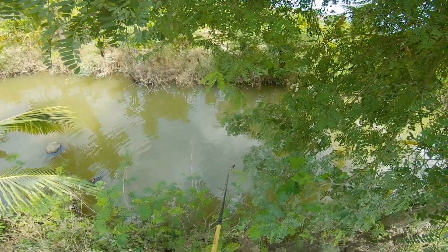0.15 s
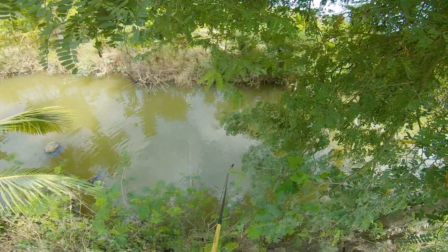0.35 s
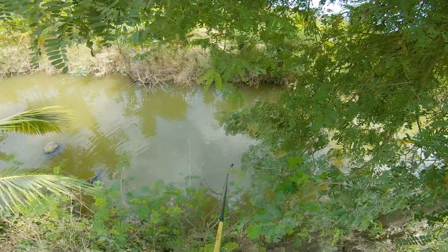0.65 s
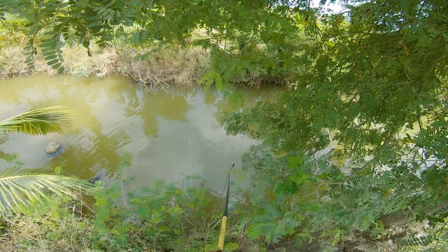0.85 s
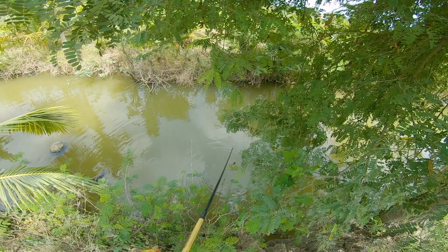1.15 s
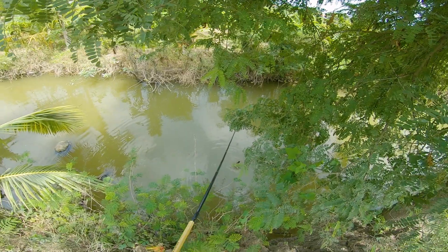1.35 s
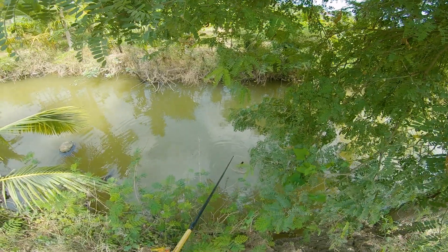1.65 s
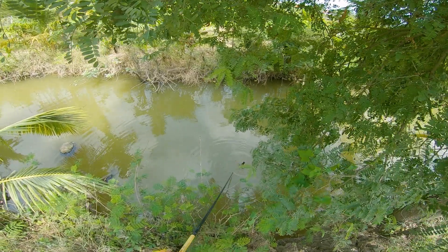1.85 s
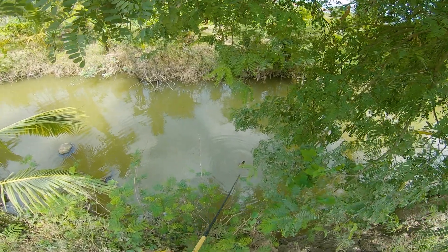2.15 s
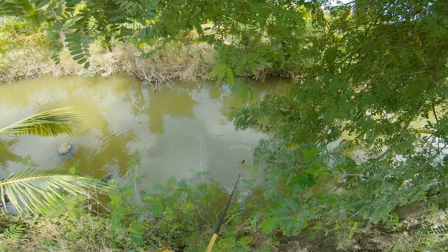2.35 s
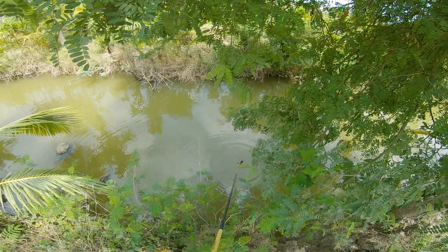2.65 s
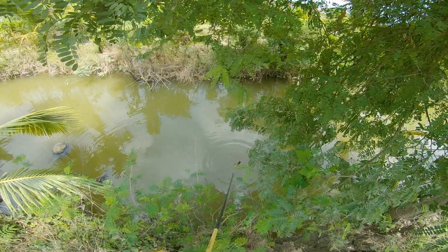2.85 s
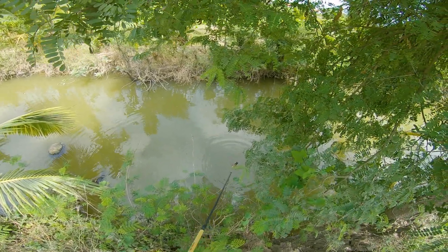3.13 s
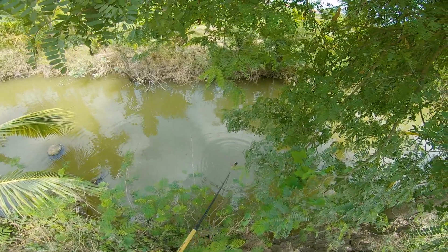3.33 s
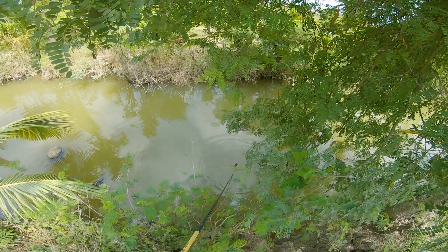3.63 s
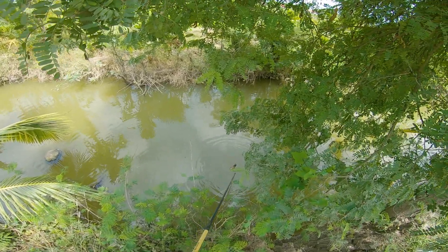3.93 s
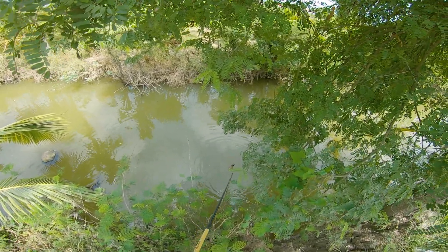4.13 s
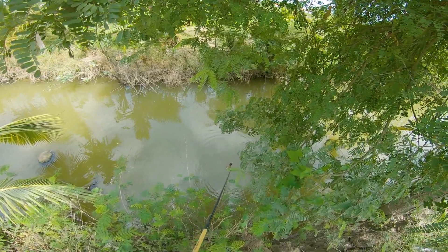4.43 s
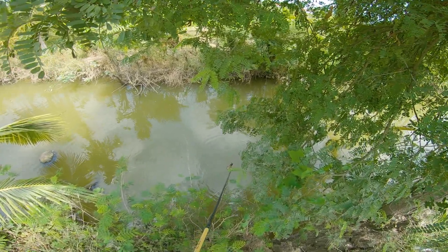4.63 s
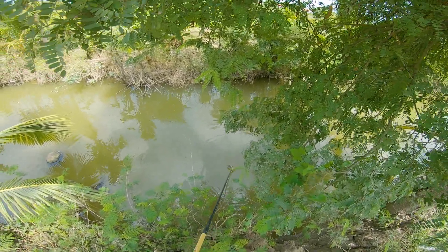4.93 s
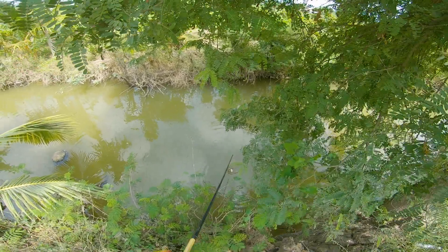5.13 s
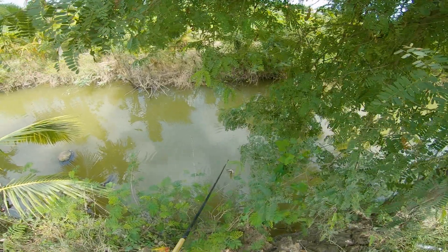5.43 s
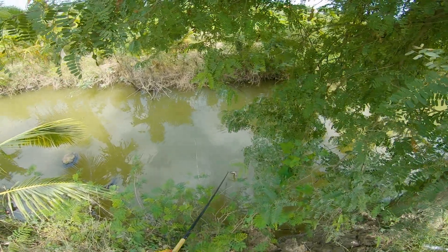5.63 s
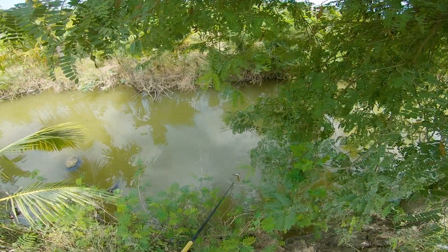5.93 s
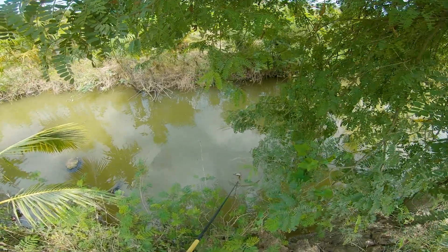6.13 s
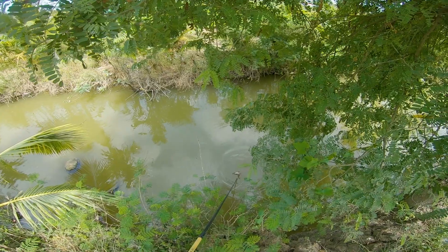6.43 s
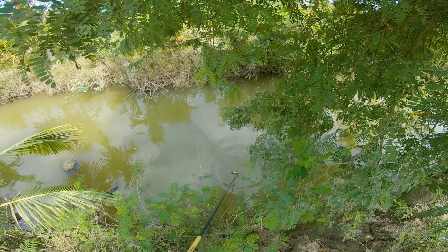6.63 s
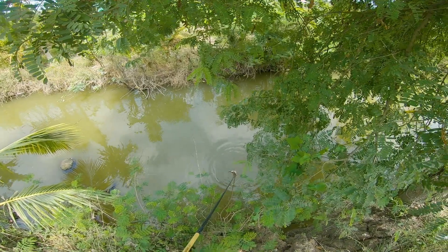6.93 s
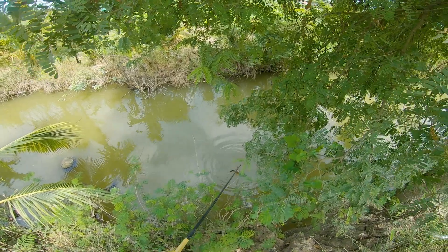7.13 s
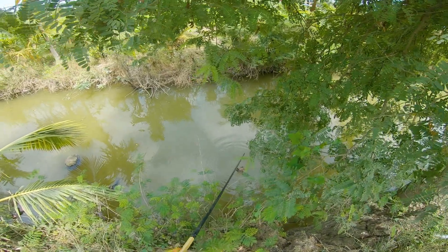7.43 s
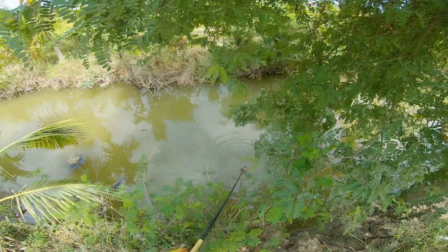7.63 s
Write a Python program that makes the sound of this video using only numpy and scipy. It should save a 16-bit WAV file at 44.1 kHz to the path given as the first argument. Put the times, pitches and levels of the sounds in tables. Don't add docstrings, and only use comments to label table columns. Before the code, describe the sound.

Outdoors by a tree-lined pond, a near dove on the right gives three rolling, pure-toned trills, with a second dove behind it and a distant echoing one on the left. Small birds chirp, whistle and buzz thinly. Dry leaves rub and snap right at the microphone, hardest around five to six seconds and at the end. Light wind rumble, faint hiss and a growing cricket lie underneath.

```python
import sys
import numpy as np
from scipy import signal
from scipy.fft import rfft, irfft, next_fast_len
from scipy.io import wavfile
from scipy.ndimage import uniform_filter1d, map_coordinates

SR = 44100
rng = np.random.default_rng(int(sys.argv[2]) if len(sys.argv) > 2 else 0)


def boost(x):
    u = np.asarray(x, float) / 20
    return 10 ** u


def unload_wav(signal):
    wavfile.write(
        sys.argv[1],
        SR,
        np.round(np.clip(np.atleast_2d(signal).T, -1, 1) * 32767).astype(np.int16),
    )


N = 342944
T = np.arange(N) / SR


def unit(x):
    return x / np.sqrt(np.mean(x ** 2) + 1e-20)


def along(points, hz):
    f, v = np.transpose(points)
    return np.interp(np.log(hz + 1), np.log(f + 1), v)


def curves(rows):
    s, *columns = np.transpose(rows)
    return [np.interp(T, s, column) for column in columns]


def wobble(rate):
    knots = rng.standard_normal(int(N * rate / SR) + 4)
    return map_coordinates(knots, [T * rate])


def fade(t, length, rise, fall):
    edge = np.minimum(t / rise, (length - t) / fall)
    return np.sin(np.pi / 2 * np.clip(edge, 0, 1)) ** 2


def sine(hz):
    return np.sin(2 * np.pi * np.cumsum(hz) / SR)


def filtered(x, response):
    m = next_fast_len(N + SR // 2)
    return irfft(rfft(x, m) * response(np.fft.rfftfreq(m, 1 / SR)), m)[..., :N]


def patchy(x, patchy_db, long):
    z = signal.stft(x, nperseg=512)[2]
    field = uniform_filter1d(rng.standard_normal(z.shape[1:]), 6, 0)
    field = uniform_filter1d(field, long, 1)
    return signal.istft(z * boost(patchy_db * unit(field)), nperseg=512)[1][:, :N]


def rush(spectrum, alike, patchy_db):
    pair = patchy(rng.standard_normal((2, N)), patchy_db, 10)

    def mid_side(hz):
        turn = np.arccos(np.clip(along(alike, hz), -1, 1)) / 2
        return boost(along(spectrum, hz)) * [np.cos(turn), np.sin(turn)]

    mid, side = filtered(pair, mid_side)
    return unit(np.array([mid + side, mid - side]))


# (frequency [Hz], 60 dB decay time [s])
GROVE_DECAY = [(800, 0.2), (3000, 0.46), (7000, 0.41)]


def outdoors(x, echo, left_db, lead):
    hz, t, z = signal.stft(rng.standard_normal((2, SR // 2)), SR, nperseg=256)
    decay = boost(-60 * t / along(GROVE_DECAY, hz)[:, None])
    tail = signal.istft(z * decay, SR, nperseg=256)[1][:, :SR // 2]
    tail = tail / np.linalg.norm(tail[0])
    wet = filtered(echo, lambda f: rfft(tail, 2 * len(f) - 2))
    left = boost(left_db) * filtered(x, lambda f: np.exp(1j * lead))
    return np.array([left, x]) + wet * boost([[left_db / 2], [0]])


# (frequency [Hz], density [dB per Hz])
BUFFET_SPECTRUM = [(8, -20), (22, 0), (45, -13.5), (60, -10.5), (90, -120)]
# (frequency [Hz], density [dB per Hz])
RUMBLE_SPECTRUM = [(35, -33), (52, -2), (63, -2.5), (75, -9.5), (110, -22.5), (160, -22.5), (260, -120)]
# (frequency [Hz], density [dB per Hz])
HISS_SPECTRUM = [(50, -34.5), (95, -2), (500, -17), (900, -11.5), (2450, -18), (9500, -30), (11500, -46),
                 (14500, -90)]
# (frequency [Hz], correlation [-1 to 1])
HISS_LIKENESS = [(60, 1), (290, 0.55), (640, -0.11), (1400, -0.26), (3100, 0.62), (6800, -0.34),
                 (12000, -0.38)]
# (time [s], half width [s], peak level [dB])
WIND_PUFFS = [(.05, .1, -46), (.37, 0.14, -49.5), (0.902, .13, -42), (1.4, 0.083, -58.5),
              (1.75, 0.12, -45.5), (2.1, 0.28, -55.5), (2.72, 0.076, -56.5), (3.62, 0.064, -56),
              (4.15, 0.14, -56), (4.45, 0.047, -52.5), (5, 0.049, -62), (5.45, 0.14, -59.5),
              (5.8, 0.037, -52), (6.68, 0.028, -52), (6.85, 0.073, -49.5), (7.35, 0.074, -52),
              (7.7, 0.049, -56)]


def air():
    breeze_db, buffet_db, veer_db_per_s, hiss_db = -66.5, 3, -2.5, -60.5
    wind = boost(breeze_db)
    for s, width, db in WIND_PUFFS:
        wind = wind + boost(db) * np.exp(-((T - s) / width) ** 2)
    buffet = boost(buffet_db + veer_db_per_s * T) * rush(BUFFET_SPECTRUM, [(30, 0.25)], patchy_db=2.5)
    rumble = rush(RUMBLE_SPECTRUM, [(60, 0.86)], patchy_db=2.5)
    hiss = boost(hiss_db + 1.44 * wobble(10)) * rush(HISS_SPECTRUM, HISS_LIKENESS, patchy_db=3)
    return (wind * (buffet + rumble) + hiss) * boost([[-.8], [.8]])


# (from time [s], rate [bursts per s])
BURST_RATE = [
    (0, 7.46),
    (.8, 7.62),
    (3.4, 7.32),
    (4.6, 7.5),
]
# (time [s], level [dB])
CRICKET_LEVEL = [
    (0, -79),
    (2.5, -75),
    (4.5, -66),
    (6.5, -65),
    (7.8, -62),
]


def cricket(stroke_rate=114.5):
    s, rate = np.transpose(BURST_RATE)
    rate_now = rate[np.searchsorted(s, T, "right") - 1]
    u = (np.cumsum(rate_now) / SR + .92) % 1
    burst = np.clip(u / .03, 0, 1) * np.clip((.8 - u) / .06, 0, 1) * boost(6 * (u - .6))
    stroke = (stroke_rate * T + .08 * wobble(20)) % 1
    hz = 8650 + 300 * u - 600 * stroke + 170 * wobble(700)
    stroke_swell = .6 + np.sin(np.pi * stroke ** .6) ** 2
    tone = burst * stroke_swell * boost(1.5 * wobble(110)) * sine(hz)
    tone = unit(tone) * boost(curves(CRICKET_LEVEL)[0])
    return outdoors(tone, boost(-20) * tone, left_db=3.5, lead=-2.3)


# (time [s], length [s], first pitch [Hz], last
# pitch [Hz], level [dB])
CHIRP_NOTES = [(.375, 0.037, 6470, 5740, -63), (0.455, 0.054, 5220, 5400, -68),
               (0.87, 0.015, 5660, 6200, -57), (0.941, 0.03, 3580, 5100, -60.5),
               (0.993, 0.029, 3970, 4170, -57), (1.007, 0.065, 3500, 2870, -57.5),
               (1.212, 0.012, 4490, 4230, -47), (1.77, 0.076, 6030, 4600, -71),
               (1.86, 0.13, 2540, 2880, -59), (1.955, 0.12, 2920, 2534, -66),
               (2.176, 0.019, 4170, 4500, -58.5), (2.317, 0.06, 2800, 2150, -60),
               (2.438, 0.056, 3270, 3370, -65.5), (2.771, 0.0093, 3660, 3530, -64),
               (2.79, .015, 6300, 6000, -65), (2.808, 0.017, 5760, 5400, -59),
               (2.832, 0.08, 5400, 4900, -68), (2.84, 0.027, 3180, 3200, -68),
               (3.245, 0.029, 5600, 6250, -63.5), (3.27, 0.13, 858, 832, -66),
               (3.334, 0.013, 4240, 5200, -58), (4.977, 0.058, 2810, 2126, -53.5),
               (6.778, .03, 3470, 3360, -64), (7.27, 0.091, 773, 860, -54)]
# (time [s], level [dB])
LOW_BUZZES = [
    (.32, -64),
    (.355, -63),
    (.48, -66),
    (.51, -65),
    (.69, -62),
    (.71, -61),
    (6.325, -58),
    (6.36, -60),
    (6.4, -61),
]
# (time [s], level [dB])
HIGH_BUZZES = [
    (3.925, -68),
    (3.98, -65.5),
    (4.045, -62),
    (4.12, -62.5),
    (4.18, -58.5),
    (4.255, -62),
    (4.345, -67.5),
]


def small_birds():
    x = np.zeros(N)
    for s, length, first, last, db in CHIRP_NOTES:
        on = slice(int(s * SR), int((s + length) * SR))
        glide = np.linspace(first, last, on.stop - on.start)
        x[on] += boost(db) * fade(T[on] - s, length, 0.19 * length, 0.15 * length) * sine(glide)
    for table, length, band_hz in ((LOW_BUZZES, .022, [4200, 4800]), (HIGH_BUZZES, .035, [4600, 7200])):
        b, a = signal.butter(4, band_hz, "band", fs=SR)
        t = T[:int(length * SR)]
        gate = fade(t, length, 0.12 * length, 0.49 * length)
        for s, db in table:
            puff = unit(signal.lfilter(b, a, rng.standard_normal(SR // 8)))[-len(t):]
            x[int(s * SR):][:len(t)] += boost(db) * gate * puff
    x = x * boost(3.9 * wobble(200))
    return outdoors(x, boost(-1) * x, left_db=-4.0, lead=.1)


# (time [s], pitch [Hz], level [dB])
WHISTLE_GLIDE = [
    (0, 3650, -8),
    (.05, 4600, 2),
    (.12, 5100, 5),
    (.165, 5800, 6.5),
    (.195, 6400, -1),
    (.225, 6450, -10),
]
# (time [s], stretch [ratio], pitch factor [ratio], level [dB])
WHISTLE_CALLS = [
    (.505, 0.9, 0.98, -61.5),
    (2.841, 1.08, 1.0, -62),
    (4.76, 0.99, 0.98, -64),
    (6.549, 0.99, 0.98, -61.5),
]


def whistles():
    x, (s, pitch, db) = np.zeros(N), np.transpose(WHISTLE_GLIDE)
    for start, stretch, factor, call_db in WHISTLE_CALLS:
        t = np.arange(int(s[-1] * stretch * SR)) / SR
        hz = uniform_filter1d(np.interp(t / stretch, s, factor * pitch), size=900, mode="nearest")
        size = fade(t, t[-1], 0.0058, 0.012) * boost(call_db + np.interp(t / stretch, s, db))
        x[int(start * SR):][:len(t)] = size * sine(hz)
    x = x * boost(4.5 * wobble(90))
    return outdoors(x, boost(5.0) * x, left_db=4.5, lead=2.5)


# (time [s], length [s], body level [dB], crisp part above the body [dB])
RUSTLE_STROKES = [(0.449, 0.05, -61, -12), (0.975, 0.35, -61.5, -12.5), (1.211, 0.024, -56, -9),
                  (1.248, 0.05, -51, -21), (1.312, 0.14, -45.5, -20.5), (1.443, 0.032, -46, -26),
                  (1.47, 0.081, -57.5, -15), (1.555, 0.045, -53.5, -21), (1.61, 0.12, -53.5, -17),
                  (1.741, 0.012, -42.5, -21), (1.753, 0.11, -54, -20), (1.88, 0.11, -56, -12),
                  (2.382, 0.04, -61, -16), (3.541, 0.024, -52, -18), (4.667, 0.045, -62, -24),
                  (5.57, 0.07, -57, -14.5), (5.642, 0.026, -49, -16.5), (5.709, 0.011, -47, -21),
                  (5.76, 0.017, -51.5, -16), (5.788, 0.066, -50.5, -9.5), (5.859, 0.097, -42.5, -20.5),
                  (5.94, 0.244, -55, -12.5), (6.167, 0.03, -44.5, -22), (6.205, 0.094, -55.5, -15),
                  (6.3, 0.141, -63, -12), (6.876, 0.041, -52.5, -18), (7.184, 0.048, -54.5, -7.5),
                  (7.271, 0.05, -49, -11), (7.333, 0.058, -48, -13), (7.392, 0.042, -47.5, -13.5)]
# (time [s], effort [dB], crisp part above the body [dB])
LEAF_PULLS = [
    [(5.03, -59.5, -6.5), (5.14, -54.5, -13), (5.235, -40, -17), (5.255, -54, -8.5), (5.3, -37.5, -13.5),
     (5.415, -45, -1.5), (5.428, -46, -16.5), (5.48, -41.5, 6), (5.525, -59, -17)],
    [(7.438, -41.5, -8), (7.53, -45.5, -1.5), (7.548, -49, -11), (7.57, -38.5, 0), (7.615, -38, -8),
     (7.632, -53, -19), (7.648, -55, -25), (7.66, -39, -9.5), (7.756, -37.5, -5.5)],
]


def rustle_force(column):
    force = np.zeros(N + SR)
    for s, length, db, crisp_db in RUSTLE_STROKES:
        t = T[:int((length + .008) * SR)]
        force[int((s - .004) * SR):][:len(t)] += boost(db + column * crisp_db) * fade(t, t[-1], 0.0057, 0.0094)
    for pull in LEAF_PULLS:
        db, crisp_db = curves(pull)
        start, end = pull[0][0], pull[-1][0]
        force[:N] += boost(db + column * crisp_db) * fade(T - start, end - start, .008, 0.0091)
    keep = np.exp(-1 / (.03 * SR))
    settling = signal.lfilter([1 - keep], [1, -keep], force)
    return (force + boost(-13.5) * settling)[:N]


def modes(table):
    def response(f):
        total = 0
        for k, (c, w, db) in enumerate(table):
            total = total + (-1) ** k * boost(db) * 1j * f * w / (c * c - f * f + 1j * f * w)
        return total
    return response


# (time [s], peak level [dB], crisp part above the peak [dB])
STALK_SNAPS = [(1.2162, -46, -13), (1.4522, -37, -26), (1.618, -30.5, -43), (1.6367, -31, -34),
               (1.657, -35, -33), (1.665, -31.5, -35), (1.692, -42, -16), (1.703, -27, -49),
               (1.7457, -36.5, -13), (3.713, -58, -5), (3.9299, -53, -15), (5.3173, -29, -18),
               (5.4476, -35, -12), (5.477, -33, 11), (5.4923, -32.5, 13), (5.7125, -39, -9),
               (5.7587, -38.5, -1), (6.187, -30, -38), (6.8888, -42, -8), (7.441, -36, -15),
               (7.5825, -34.5, 2), (7.6195, -14, -7), (7.657, -35, -9), (7.729, -34, 1)]
# (frequency [Hz], width [Hz], level [dB])
BODY_MODES = [(1346, 174, -1), (1862, 207, 0.5), (2710, 255, -8), (3500, 318, -7)]
# (frequency [Hz], width [Hz], level [dB])
CRISP_MODES = [(4700, 820, 1.5), (6300, 590, 5), (8160, 1660, 2.5), (10030, 920, 0.5), (13900, 700, -13.5)]
# (frequency [Hz], left lead [rad])
CLOSE_LEAD = [(300, -12), (1200, 4.5), (1900, 1.6), (3500, 1.05), (5500, -2), (7500, -0.9), (11000, -6.5)]
# (frequency [Hz], left minus right [dB])
CLOSE_LEAN = [(1500, -2), (3500, -0.5), (5000, -11), (8000, 0), (14000, 12.5)]


def rustle():
    def between_ports(f):
        half = .5j * along(CLOSE_LEAD, f) + np.log(boost(along(CLOSE_LEAN, f) / 2))
        return np.exp(half * np.array([[1], [-1]]))

    out = np.zeros((2, N))
    for table, column, gain_db, kick_db, alike in ((BODY_MODES, 0, 1, 7.5, .85), (CRISP_MODES, 1, 5.5, 6.5, .4)):
        ring = modes(table)
        force = rustle_force(column)
        clumps = boost(2.5 * wobble(70) + 3 * wobble(500))
        grains = clumps * patchy(rng.standard_normal((2, N)), patchy_db=4, long=5)
        grains = grains / np.std(filtered(grains[0], ring)) * force * boost(gain_db)
        grains[1] = alike * grains[0] + np.sqrt(1 - alike ** 2) * grains[1]
        for s, peak_db, bright_db in STALK_SNAPS:
            blow = np.hanning(2.5 + round((1 - column) * max(-.6 * bright_db, 0)))
            rung = irfft(rfft(blow, 2048) * ring(np.fft.rfftfreq(2048, 1 / SR)))
            blow = blow / np.abs(rung).max()
            grains[:, int(s * SR):][:, :len(blow)] += boost(peak_db + column * bright_db + kick_db) * blow
        out += filtered(grains, lambda f: ring(f) * between_ports(f))
    return filtered(out, lambda f: 1 / (1 + (f / 10800) ** 11) ** .5)


def dove(song, calls, left_db, lead, open_hz, swell_db=12, swell_hz=1010, break_hz=1075):
    slur_hz = 1005
    tied = [False]
    for a, b in zip(song, song[1:]):
        tied.append(b[0] - a[0] - a[1] < .003 and a[3] > slur_hz)
    tied.append(False)
    hz, size, echo = np.full(N, 1e3), np.zeros(N), np.zeros(N)
    for start, stretch, factor, call_db, echo_db in calls:
        for k, (s, length, top, last, db) in enumerate(song):
            tied_in, tied_out = tied[k], tied[k + 1]
            first = song[k - 1][3] - 10 if tied_in else open_hz
            t0, span = start + s * stretch, length * stretch
            on = slice(int(t0 * SR), int((t0 + span) * SR) + 1)
            t, up = T[on] - t0, min(.56 * span, .036)
            rise = np.clip(t / up, 0, 1)
            fall = np.clip((t - up) / (span - up), 0, 1)
            climb = (top - first) * np.sin(np.pi / 2 * rise ** 1.5) ** 2
            pitch = first + climb - (top - last + 30) * fall ** 1.5
            onset = 0.87 * span if top < break_hz else 0.67 * up
            gate = fade(t, span, 1e-5 if tied_in else onset, 1e-5 if tied_out else .013)
            low = (fall <= 0) | (top < break_hz)
            register = np.where(low, np.tanh((pitch - break_hz) / 22), 1)
            swell = np.where(low, swell_db * np.exp(-((pitch - swell_hz) / 90) ** 2), 0)
            swell = swell + 4 * (1 - rise) * (first > break_hz)
            hz[on] = factor * pitch
            size[on] = gate * register * boost(call_db + db + swell)
            echo[on] = boost(echo_db)
    hz = uniform_filter1d(hz, size=150) + 6 * wobble(120)
    tone = uniform_filter1d(size, size=170) * boost(1.2 * wobble(90)) * sine(hz)
    return outdoors(tone, tone * echo, left_db, lead)


# (time in song [s], length [s], top pitch [Hz], last pitch [Hz], level [dB])
FAR_SONG = [
    (0, 0.0471, 930, 1020, 3),
    (.047, .205, 1229, 1090, -10),
    (.258, 0.036, 1046, 1000, 2.5),
    (.315, 0.0291, 930, 907, 5),
    (.385, .035, 950, 900, 5),
    (.485, 0.047, 1054, 1063, 2),
]
# (time [s], stretch [ratio], pitch factor [ratio], level [dB], echo [dB])
FAR_CALLS = [
    (1.115, 0.98, 1.0, -56, 4.6),
    (5.36, 0.97, 0.99, -60, 7),
]


def far_dove():
    return dove(FAR_SONG, FAR_CALLS, left_db=8, lead=0.99, open_hz=868,
                swell_db=-1, swell_hz=930, break_hz=1000)


# (time in song [s], length [s], top pitch [Hz], last pitch [Hz], level [dB])
SECOND_SONG = [
    (0, 0.026, 982, 1038, 0),
    (.03, .13, 1276, 1194, 0),
    (.17, .04, 1218, 1075, 0),
    (.245, .04, 1170, 1050, 0),
    (.345, .1, 1258, 990, 0),
]
# (time [s], stretch [ratio], pitch factor [ratio], level [dB], echo [dB])
SECOND_CALLS = [
    (2.009, 0.98, 1.032, -41.5, -12),
    (2.722, 1.07, 1.08, -58, -4),
    (5.815, 1.0, 1.0, -42, -9),
    (6.399, 0.97, 1.075, -58, -1),
]


def second_dove():
    return dove(SECOND_SONG, SECOND_CALLS, left_db=-13.5, lead=2.6, open_hz=930)


# (time in song [s], length [s], top pitch [Hz], last pitch [Hz], level [dB])
NEAR_NOTES = [(-.036, .016, 1060, 1000, -19), (-.02, .036, 992, 1057, -1), (.016, .04, 1303, 1239, 3.5),
              (.056, .039, 1313, 1204, -1.5), (.095, .035, 1277, 1154, -0.5), (.13, 0.049, 1240, 1001, 1.5),
              (.171, .052, 1233, 986, 1), (.226, .042, 1213, 1002, 3.5), (.288, 0.0425, 1200, 984, 3),
              (.362, .052, 1198, 995, 1.5), (.48, 0.094, 1257, 1027, -0.5)]
# (time [s], stretch [ratio], pitch factor [ratio], level [dB], echo [dB])
NEAR_TIMES = [
    (1.9155, 1.0, 1.0, -29, -14),
    (4.313, 1.0, 1.0, -27.5, -14),
    (7.164, 1.013, 1.0, -28, -14),
]


def near_dove():
    return dove(NEAR_NOTES, NEAR_TIMES, left_db=-11.0, lead=2.15, open_hz=959.5)


def scene():
    background = air() + cricket() + small_birds() + whistles()
    return background + rustle() + far_dove() + second_dove() + near_dove()


def roll_off(x):
    return signal.sosfilt(signal.butter(12, 15690, fs=SR, output="sos"), x)


def record(dry):
    return roll_off(dry)


dry = scene()
out = record(dry)
unload_wav(out)
```